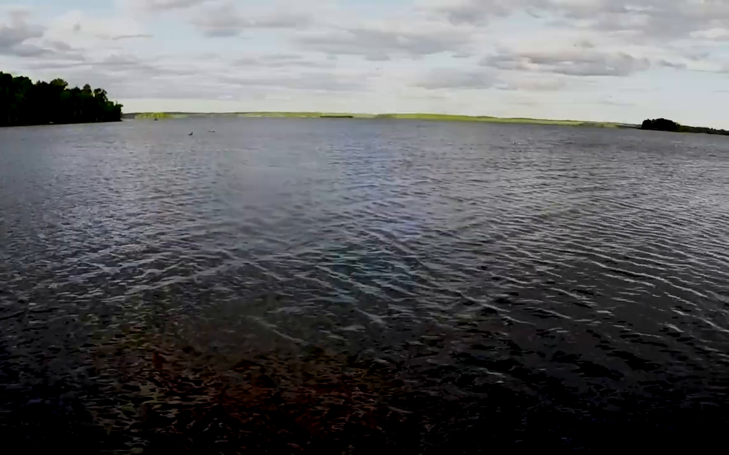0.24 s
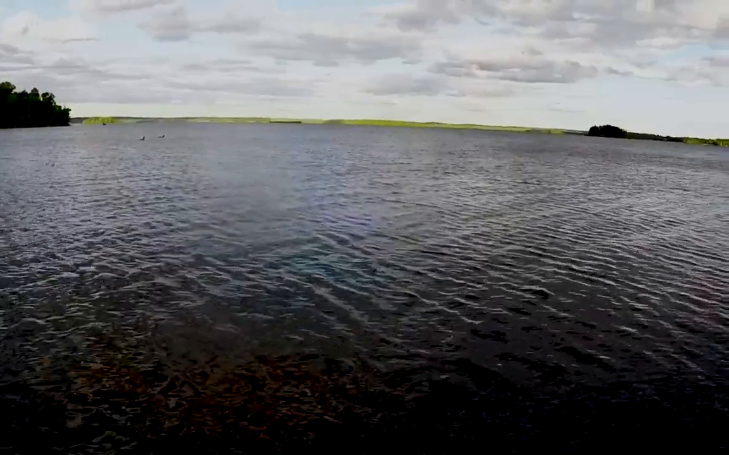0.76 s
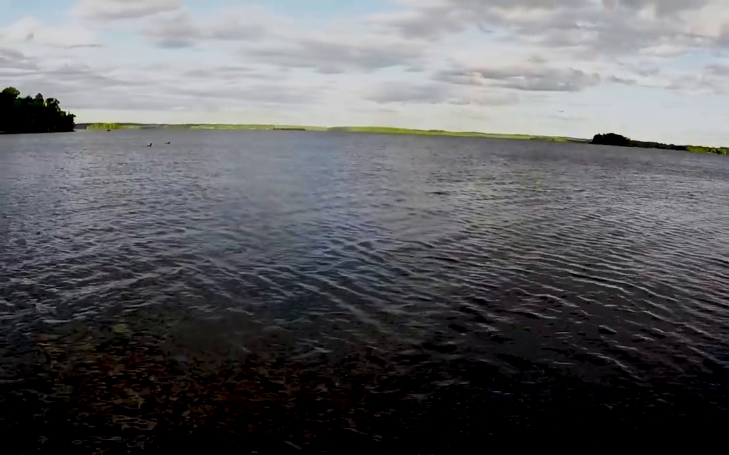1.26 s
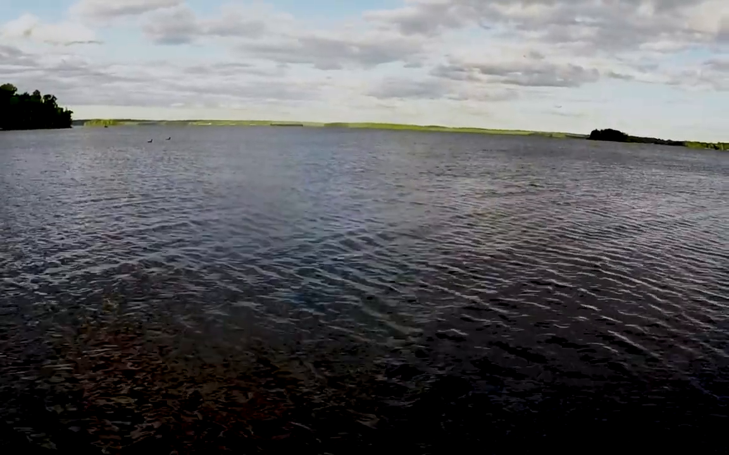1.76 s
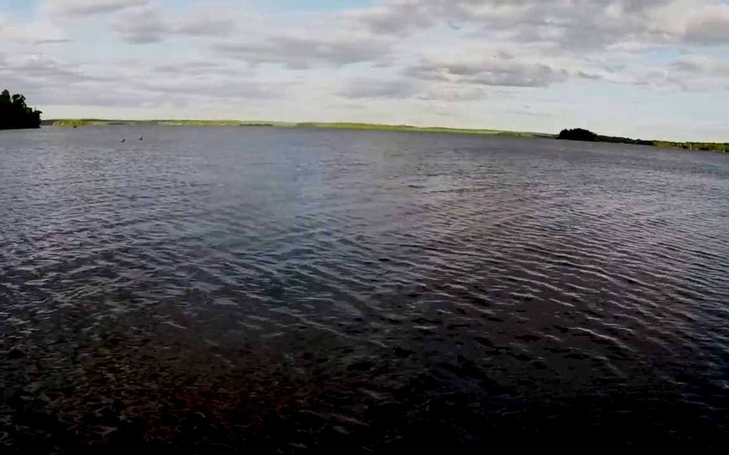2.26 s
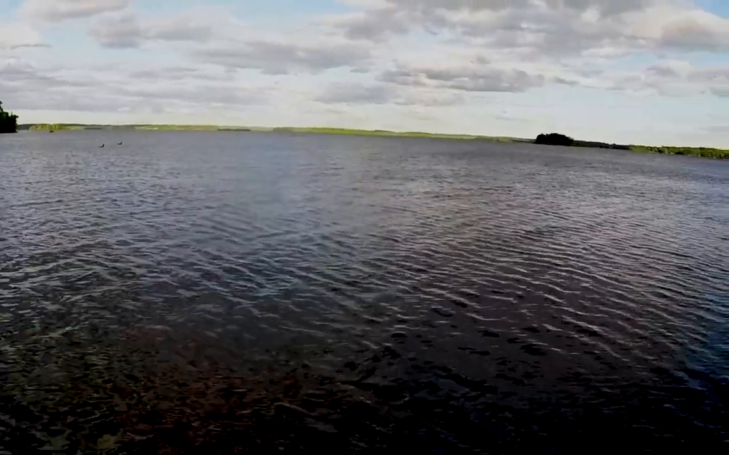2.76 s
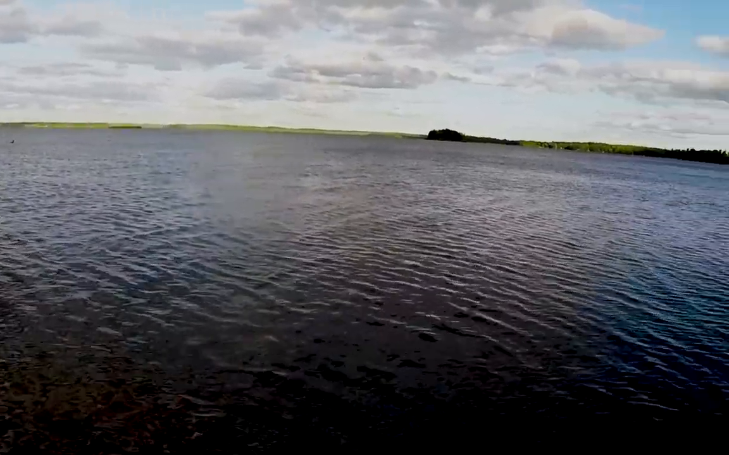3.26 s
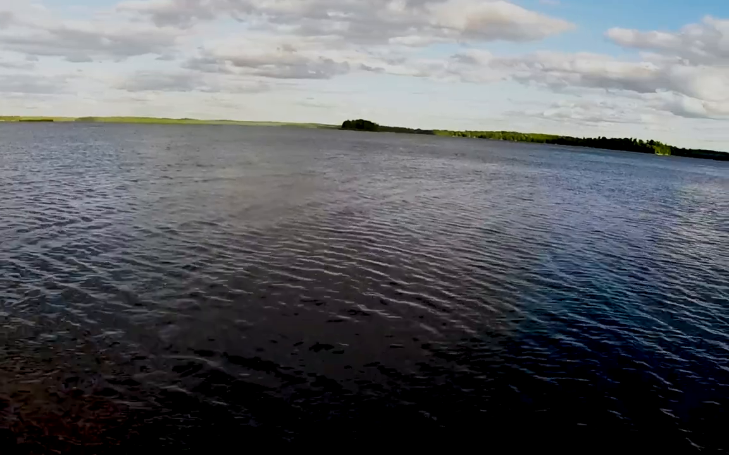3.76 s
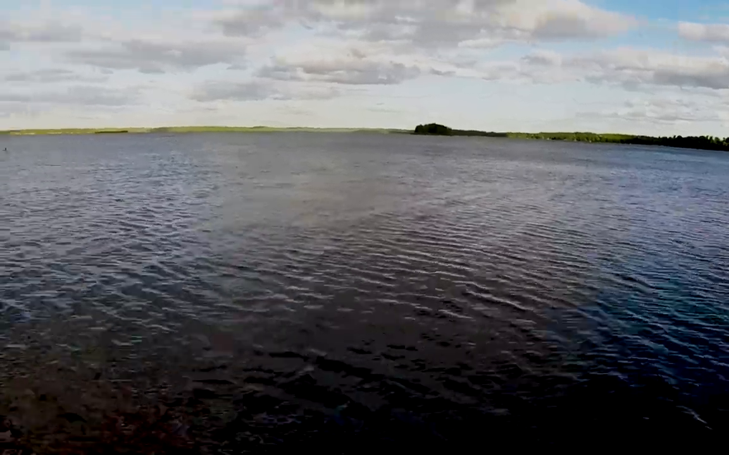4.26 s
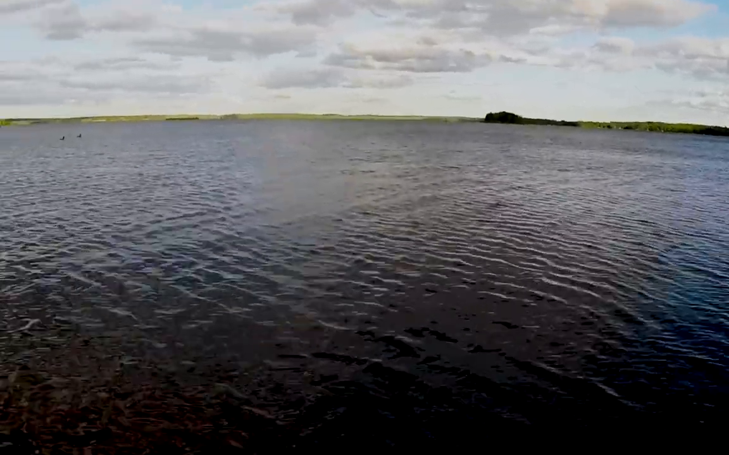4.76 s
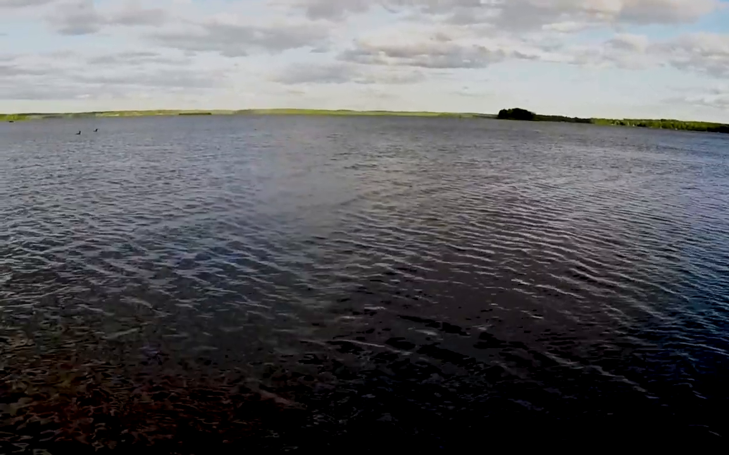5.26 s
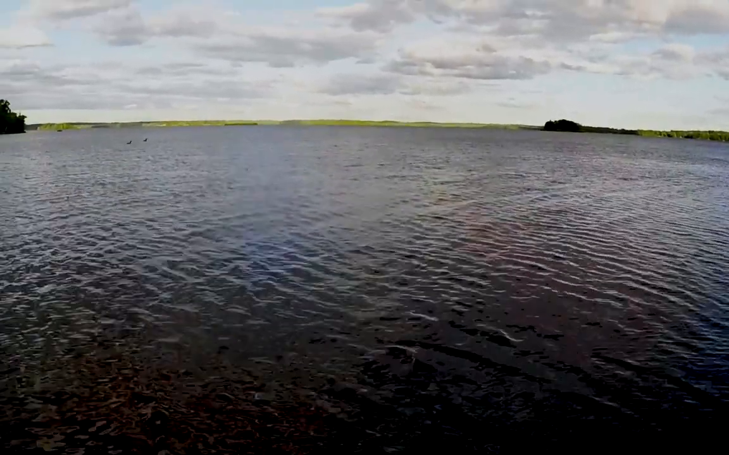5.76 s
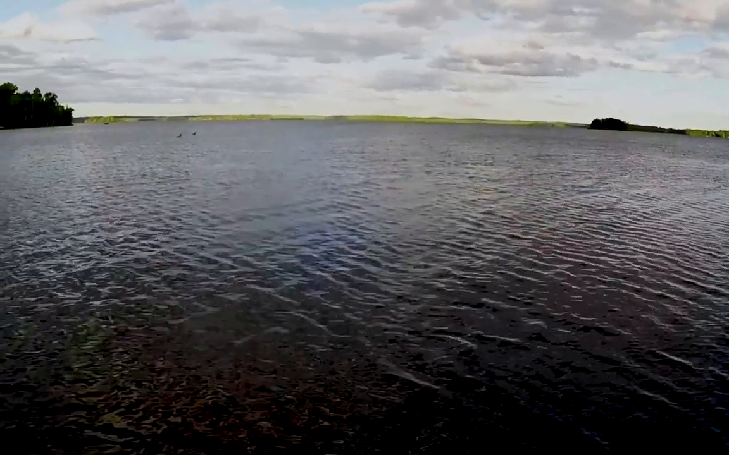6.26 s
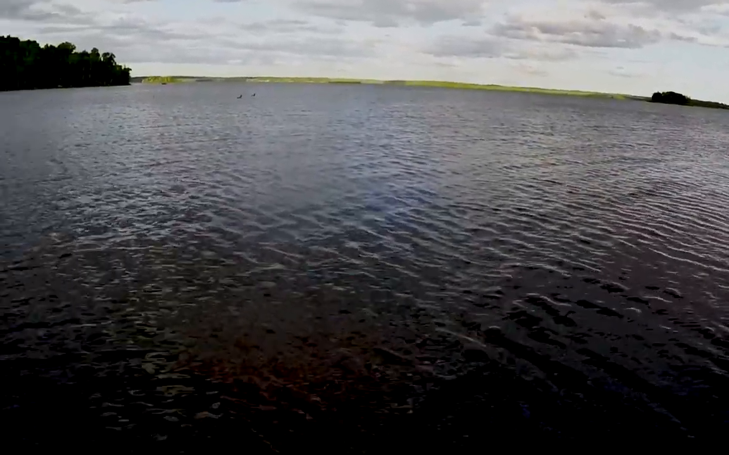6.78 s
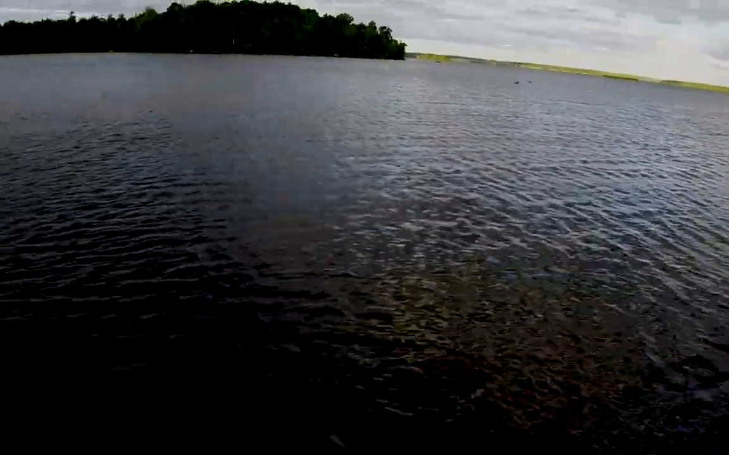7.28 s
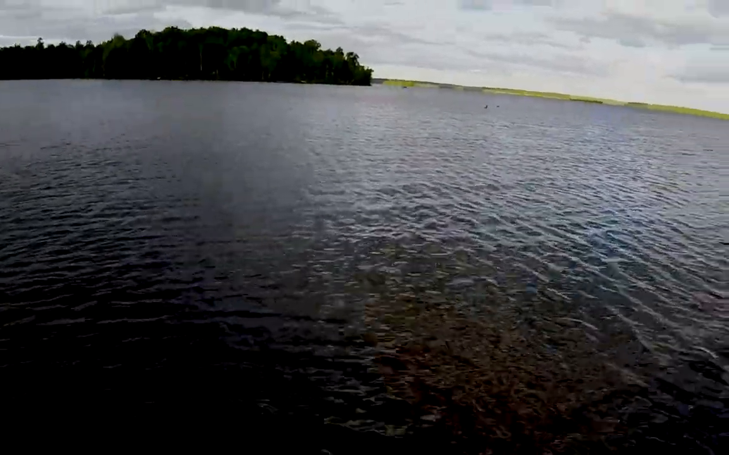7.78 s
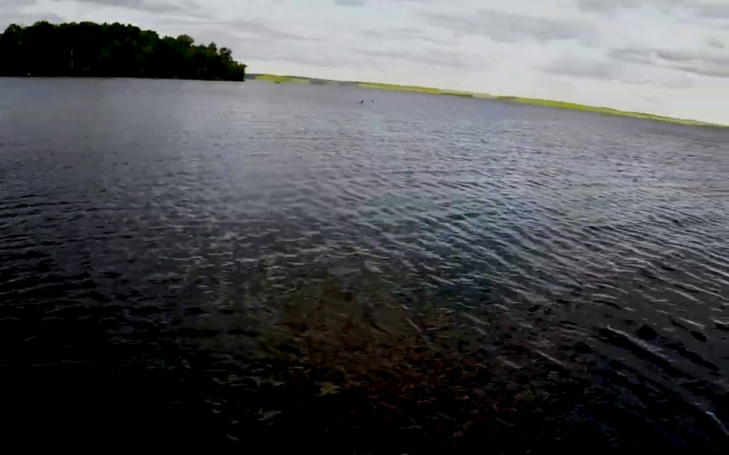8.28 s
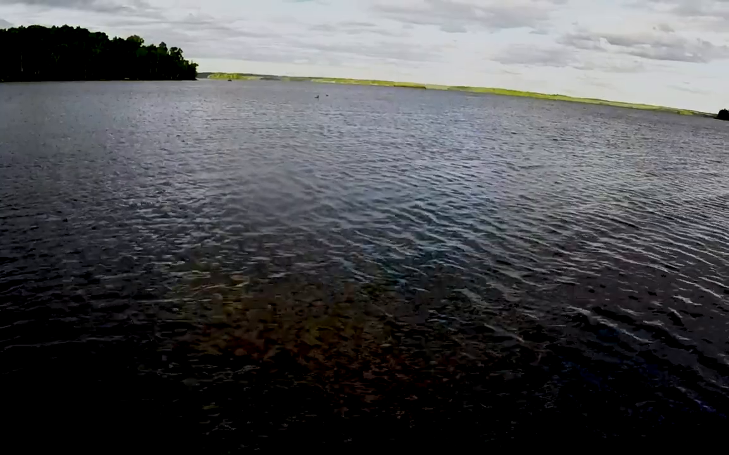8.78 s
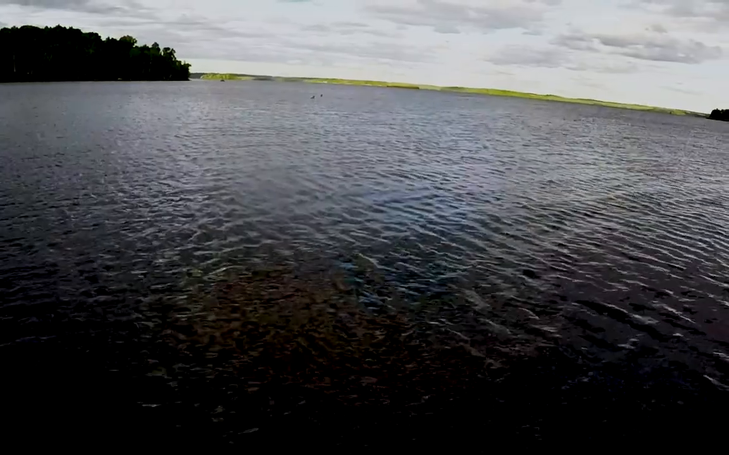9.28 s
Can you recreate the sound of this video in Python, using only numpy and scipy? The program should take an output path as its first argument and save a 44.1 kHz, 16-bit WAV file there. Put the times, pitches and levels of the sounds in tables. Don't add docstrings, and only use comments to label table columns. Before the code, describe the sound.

A loon's high, leaping yodel ends at once, then two loons exchange fast quavering laughs, the lower one nearer and steadier, the higher one answering and overlapping. Wooded shores return long soft echoes. Small waves gulp at the bank over a quiet wash and faint hiss. Late on, wind thumps and rumbles on the handheld microphone, with a few tiny handling clicks.

```python
import sys
import numpy as np
from scipy import signal
from scipy.fft import rfft, irfft, next_fast_len
from scipy.io import wavfile
from scipy.ndimage import uniform_filter1d, map_coordinates

SR = 44100
rng = np.random.default_rng(int(sys.argv[2]) if len(sys.argv) > 2 else 0)


def volts_from_db(level):
    exponent = np.asarray(level, float) / 20
    return 10 ** exponent


def unload_wav(signal):
    wavfile.write(
        sys.argv[1],
        SR,
        np.round(np.clip(np.atleast_2d(signal).T, -1, 1) * 32767).astype(np.int16),
    )


N = 420273
TIME = np.arange(N) / SR


def unit(x):
    return x / np.sqrt(np.mean(x ** 2) + 1e-20)


def along(points, hz):
    f, v = np.transpose(points)
    return np.interp(np.log(hz + 1), np.log(f + 1), v)


def wobble(rate):
    t = np.arange(0, N + 64, 64) / SR
    coarse = map_coordinates(rng.standard_normal(int(N * rate / SR) + 4), [t * rate])
    return np.interp(TIME, t, coarse)


def noise(gain):
    m = next_fast_len(N + 8192)
    spectrum = rfft(rng.standard_normal(m)) * gain(np.fft.rfftfreq(m, 1 / SR))
    return unit(irfft(spectrum, m)[:N])


def shaped_noise(points):
    return noise(lambda hz: volts_from_db(along(points, hz)))


def narrow_noise(centre_hz, width_hz):
    return noise(lambda hz: np.exp(-((hz - centre_hz) / width_hz) ** 2))


def broad_noise(centre_hz, spread):
    return noise(lambda hz: np.exp(-np.log((hz + 1) / centre_hz) ** 2 / spread))


def bursts(rows):
    return sum(volts_from_db(db) * np.exp(-((TIME - s) / half) ** 2) for s, half, db in rows)


# (frequency [Hz], gain [dB])
PIPE = [(350, -19.5), (750, -1.5), (1200, -0.5), (1600, -2), (2000, -21.5), (2400, -25.5), (3000, -31.5),
        (3600, -26.5), (4400, -35), (5200, -26.5), (6200, -44.5), (7500, -34.5), (10000, -63.5)]


def loon(phrases, facing, flare, roundness, tilt_db, waver_hz, flutter_db, breath_db, reed_db, attack, order):
    out, drift, flutter = np.zeros(N), wobble(45), wobble(60)
    turbulence = noise(lambda hz: 1 / (1 + (hz / 260) ** 2))
    k = np.arange(1, 9)[:, None]
    fading = np.array([wobble(7) for _ in k])
    when, octave_db, higher_db, top_db = np.transpose(facing)
    for rows, (end, end_hz, end_db) in phrases:
        s, hz, arch, db, swell = np.transpose([*rows, (end, end_hz, 0, end_db, 0)])
        first = max(round((s[0] - attack / 2) * SR), 0)
        at = np.arange(first, min(round((end + attack / 2) * SR), N))
        t = at / SR

        place = np.interp(t, s, np.arange(len(s)))
        row = place.astype(int)
        bow = np.abs(np.sin(np.pi * place))
        pitch = np.interp(t, s, hz) + arch[row] * bow ** roundness + waver_hz * drift[at]
        level = np.interp(t, s, db) + swell[row] * bow ** 1.47 + flutter_db * flutter[at]

        crest = np.clip(arch[row] / 190, 0, 1) * (bow - .7)
        colour = along(PIPE, k * pitch) - along(PIPE, pitch)
        colour = colour + tilt_db * np.log2(k) + np.c_[flare] * crest
        if hz.mean() > 940:
            colour += (k == 2) * np.interp(t, when, octave_db)
            colour += (k > 2) * np.interp(t, when, higher_db)
            colour += (k >= order) * np.interp(t, when, top_db)
        elif hz.mean() > 550:
            colour += (k == 2) * reed_db + (k > 2) * (6.5 - 1.6 * (k - 3))
            colour += (k > 1) * 0.86 * (level + 35)
            colour += (k == 2) * np.clip(.09 * (pitch - 860), 0, 9)
            colour += (k > 1) * np.clip(.25 * (pitch - 720), -11, 0)
        colour += (k > 1) * 2.4 * fading[:, at]

        phase = 2 * np.pi * np.cumsum(pitch) / SR
        tone = np.sum(volts_from_db(colour) * np.sin(k * phase), axis=0)
        edge = np.clip(np.minimum(t - s[0], end - t) / attack + .5, 0, 1)
        breath = 1 + volts_from_db(breath_db) * turbulence[at]
        out[at] += np.sqrt(2) * volts_from_db(level) * edge * tone * breath
    return out


def trills(throbs, breaths, entries, tails, hump_db):
    starts = [i for i, row in enumerate(throbs) if i == 0 or row[0] - throbs[i - 1][0] > .2]
    phrases = []
    for a, b, (db, fade_db), entry, tail in zip(starts, starts[1:] + [None], breaths, entries, tails):
        group = throbs[a:b]
        u = np.linspace(0, 1, len(group))
        levels = db + fade_db * u + hump_db * np.sin(np.pi * u ** .7)
        troughs = [(row[0], row[1], level) for row, level in zip(group, levels)] + tail
        rows = [entry]
        for throb, (s, hz, level), (_, next_hz, next_db) in zip(group, troughs, troughs[1:]):
            arch = throb[2] - (hz + next_hz) / 2
            swell = throb[3] - (level + next_db) / 2
            rows.append((s, hz, arch, level, swell))
        phrases.append((rows, troughs[-1]))
    return phrases


def climbs(leads, tunes, climb_db):
    shelf_hz, break_hz, flick_share = 865, 960, .2
    phrases = []
    for (start, dip, end, db), (hz, bow, dip_hz) in zip(leads, tunes):
        flick = end - flick_share * (end - dip)
        rows = [(start, hz, bow, db - .6, 0.042 * bow),
                (dip, dip_hz, 8, db, 1.8),
                (flick, shelf_hz, -6, db + climb_db, .6)]
        phrases.append((rows, (end, break_hz, db + climb_db - 7)))
    return phrases


def scoops(sweeps):
    phrases = []
    for start, end, hz, to_hz, db in sweeps:
        rise = to_hz - hz
        phrases.append(([(start, hz, 45 - .27 * rise, db, 5)], (end, to_hz, db - 2.5 + .03 * rise)))
    return phrases


def drops(falls):
    phrases = []
    for start, end, hz, db in falls:
        span = end - start
        phrases.append(([(start, hz, -4, db, 1.5)], (end, hz - 1300 * span, db - 5 - 120.5 * span)))
    return phrases


def grunts(rows):
    return [([(start, 343.5, -8, db, 1.5)], (end, 495, db + 9.5)) for start, end, db in rows]


def flips(rows):
    return [([(start, hz, 1, db, 1)], (end, hz - 25, db - 4)) for start, end, hz, db in rows]


# (time [s], pitch [Hz], arch over the line to the next row [Hz], level [dB], swell in mid-throb [dB])
YODEL = [
    [(-0.01, 1720, 18, -31, -4.5)],
    [(0.122, 1442, -59.5, -31.5, -0.5)],
    [(0.253, 1665, -16, -29, 0), (0.391, 1775, 42, -25, 2.4)],
    [(0.432, 1080, 3, -42, 3)],
]
# (time [s], pitch [Hz], level [dB])
YODEL_ENDS = [(0.12, 1607, -32.5), (0.25, 1494, -30.5), (0.43, 1680, -34.5), (0.448, 960, -46)]


def yodel():
    # (time [s], octave [dB], higher overtones [dB], topmost overtones more [dB])
    facing = [(.05, .5, 6, -1.5), (.11, -3, 1.5, -1.5), (.19, -3, -3, 1.5),
              (.27, -12, -13, 1.5), (.38, -9, -8, 1.5)]
    return loon(list(zip(YODEL, YODEL_ENDS)), facing, np.zeros(8), roundness=1.1, tilt_db=-6.0, waver_hz=3,
                flutter_db=0.0, breath_db=-35.5, reed_db=0, attack=.006, order=4)


# (trough time [s], trough pitch [Hz], crest pitch [Hz], crest level [dB])
LOW_THROBS = [(0.586, 991.0, 1220.0, -22.7), (0.683, 992.0, 1226.0, -22.4), (0.783, 981.0, 1223.0, -20.8),
              (0.89, 946.0, 1201.0, -21.9), (0.991, 980.0, 966.0, -35), (1.979, 1001.0, 1218.0, -27.3),
              (2.074, 1014.0, 1222.0, -28.7), (2.17, 1024.0, 1230.0, -28.3), (2.269, 1003.0, 1226.0, -27.2),
              (2.373, 961.0, 1196.0, -28.2), (2.473, 1007.0, 987.0, -36), (3.339, 1013.0, 1218.0, -25.3),
              (3.434, 1045.0, 1225.0, -24.2), (3.529, 1057.0, 1231.0, -24.1),
              (3.625, 1047.0, 1237.0, -23.5), (3.726, 1029.0, 1223.0, -23.4), (3.831, 1017.0, 1035.0, -30),
              (4.608, 1025.0, 1199.0, -27.3), (4.702, 1056.0, 1213.0, -27.2),
              (4.797, 1066.0, 1223.0, -28.3), (4.892, 1070.0, 1230.0, -26.8), (4.99, 1061.0, 1220.0, -26.8),
              (5.096, 1019.0, 1196.0, -26.7), (5.201, 1011.0, 994.0, -29), (5.964, 1011.0, 1206.0, -23.7),
              (6.062, 1037.0, 1219.0, -22.5), (6.158, 1049.0, 1225.0, -21.9),
              (6.256, 1042.0, 1227.0, -22.1), (6.359, 1019.0, 1209.0, -21.6), (6.463, 1022.0, 1070.0, -24),
              (7.283, 1039.0, 1221.0, -23.8), (7.38, 1081.0, 1237.0, -25.1), (7.475, 1086.0, 1237.0, -25.6),
              (7.573, 1076.0, 1230.0, -25.3), (7.677, 1031.0, 1204.0, -28.3), (7.781, 1028.0, 1009.0, -36),
              (8.565, 1009.0, 1211.0, -25.7), (8.662, 1053.0, 1224.0, -24.4),
              (8.758, 1085.0, 1231.0, -24.6), (8.855, 1087.0, 1238.0, -23.4),
              (8.956, 1076.0, 1232.0, -21.8), (9.058, 1060.0, 1148.0, -25)]
# (level in the troughs [dB], change to the end [dB])
LOW_BREATH = [(-33, 3), (-33.5, 1.5), (-30, -1), (-30, -1), (-24.5, 0), (-26.5, -4.5), (-30, 0)]
# (time [s], pitch [Hz], arch [Hz], level [dB], swell [dB])
LOW_ENTRIES = [(.535, 1330, -12, -32, 7), (1.955, 1224, 30, -31, 2.7), (3.303, 1248, -22, -30, 4),
               (4.604, 1000, 1, -33, .5), (5.943, 1160, -25, -26, 1.5), (7.232, 1240, 15, -32, 5),
               (8.537, 1165, -19, -33, 2.5)]
# (time [s], pitch [Hz], level [dB])
LOW_TAILS = [(1.03, 935, -42.5), (2.515, 960, -41), (3.932, 970, -36.5), (5.21, 990, -30),
             (6.598, 975, -32.5), (7.826, 962, -44), (9.184, 960, -37.5)]
# (start [s], end [s], level [dB])
LOW_GRUNTS = [(.325, .379, -59), (1.81, 1.84, -59.5), (3.1, 3.15, -63), (5.835, 5.865, -59),
              (7.1, 7.122, -62.5), (8.375, 8.402, -63)]
# (start [s], dip [s], break [s], level [dB])
LOW_LEADS = [(0.386, .491, .527, -36), (1.844, 1.878, 1.951, -37), (3.171, 3.242, 3.3, -37.5),
             (5.866, 5.873, 5.94, -38), (7.124, 7.196, 7.227, -34.5), (8.401, 8.475, 8.535, -35.5)]
# (start pitch [Hz], bow [Hz], dip pitch [Hz])
LOW_TUNES = [(662, 136, 710), (718, -10.5, 675), (698, 39, 720), (790, -5, 655), (721, 41.5, 723),
             (705, 32, 701)]
# (start [s], end [s], from pitch [Hz], to pitch [Hz], level [dB])
LOW_SCOOPS = [
    (4.535, 4.603, 700, 785, -39.5),
    (4.606, 4.634, 770, 880, -50),
]
# (start [s], end [s], pitch [Hz], level [dB])
LOW_DROPS = [(1.034, 1.09, 673, -39), (2.517, 2.583, 674, -39), (3.938, 3.949, 639, -48.5),
             (5.224, 5.285, 688, -41.5), (6.6, 6.624, 645, -39.5), (7.822, 7.888, 674, -39.5),
             (9.189, 9.216, 642, -44.5)]
# (start [s], end [s], pitch [Hz], level [dB])
LOW_FLIPS = [
    (.527, 0.55, 1450, -36),
    (7.225, 7.24, 1440, -41.5),
    (8.536, 8.54, 1404, -44),
]
# (time [s], octave [dB], higher overtones [dB], topmost overtones more [dB])
LOW_FACING = [(.6, 0, -4, 3), (.95, -1, 1.5, 7), (2.2, 0, -0.5, -5), (3.4, -4, -4.5, -2),
              (3.8, -3, -11.5, -2), (4.7, -1, 3, -9), (4.95, -2, 2, -9), (5.15, -1.5, -6.5, -5),
              (6.0, -0.5, -2, -9), (6.4, 1.5, -2, -12), (6.48, -5, -6, 3), (6.53, -5.5, 6, 5),
              (6.58, -6, -8, 3), (7.3, 0, -7.5, -2), (7.7, 5, -0.5, -6), (8.62, 2.5, 4, -8),
              (8.9, 3, -1, -6), (8.97, 3, -15, -3), (9.101, -1, -17, -2)]
LOW_FLARE = [.5, 4.5, 11, 16, -9, -5.5, 0, 0.5]


def low_loon():
    phrases = trills(LOW_THROBS, LOW_BREATH, LOW_ENTRIES, [[tail] for tail in LOW_TAILS], hump_db=1.1)
    phrases += grunts(LOW_GRUNTS) + climbs(LOW_LEADS, LOW_TUNES, climb_db=4.0)
    phrases += scoops(LOW_SCOOPS) + drops(LOW_DROPS) + flips(LOW_FLIPS)
    return loon(phrases, LOW_FACING, LOW_FLARE, roundness=1.25, tilt_db=-9.0, waver_hz=4, flutter_db=0.6,
                breath_db=-38.5, reed_db=.5, attack=.006, order=5)


# (trough time [s], trough pitch [Hz], crest pitch [Hz], crest level [dB])
HIGH_THROBS = [(1.806, 1000.0, 1245.0, -30.0), (1.902, 1000.0, 1240.0, -31.0),
               (1.996, 980.0, 1215.0, -32.0), (2.09, 950, 1150, -33.0), (2.19, 950),
               (3.059, 1248.0, 1440.0, -29.9), (3.145, 1208.0, 1433.0, -29.8),
               (3.239, 1190.0, 1424.0, -32.3), (3.335, 1190, 1350, -35), (3.436, 1136),
               (4.156, 1231.0, 1412.0, -27.8), (4.241, 1226.0, 1422.0, -27.7),
               (4.33, 1219.0, 1421.0, -27.1), (4.421, 1206.0, 1403.0, -29.6),
               (4.522, 1156.0, 1350.0, -32.8), (4.62, 1141), (5.275, 1240.0, 1406.0, -27.1),
               (5.362, 1246.0, 1417.0, -25.8), (5.451, 1225.0, 1414.0, -25.9),
               (5.544, 1213.0, 1398.0, -26.2), (5.646, 1161.0, 1340.0, -29.6), (5.753, 1150.0),
               (6.5, 1252.0, 1417.0, -29.6), (6.588, 1239.0, 1424.0, -27.8), (6.68, 1235.0, 1425.0, -25.7),
               (6.779, 1192.0, 1386.0, -27.4), (6.884, 1158.0), (9.33, 1252.0, 1477.0, -26.6),
               (9.425, 1216.0, 1443.0, -28.8), (9.529, 1214.0)]
# (level in the troughs [dB], change to the end [dB])
HIGH_BREATH = [(-38, -4), (-39, -3), (-40, -2.5), (-41, -2), (-40, -1), (-39.5, -1)]
# (time [s], pitch [Hz], arch [Hz], level [dB], swell [dB])
HIGH_ENTRIES = [(1.757, 1255, 18.5, -30, 2.5), (3.025, 1400, -31.5, -32, 1), (4.13, 1365, -11.5, -36, 1.5),
                (5.237, 1406, 2.5, -30, 2), (6.46, 1376, 19, -38, 2), (9.268, 1490, 76.5, -26.5, 4)]
# (start [s], dip [s], break [s], level [dB])
HIGH_LEADS = [(1.666, 1.726, 1.755, -39), (4.018, 4.072, 4.09, -38), (6.37, 6.417, 6.44, -35.5),
              (9.047, 9.058, 9.108, -41)]
# (start pitch [Hz], bow [Hz], dip pitch [Hz])
HIGH_TUNES = [(786, 54, 737), (758, 16.5, 742), (746, -11, 727), (700, 3, 715)]
# (start [s], end [s], from pitch [Hz], to pitch [Hz], level [dB])
HIGH_SCOOPS = [
    (2.219, 2.25, 660, 900, -49),
    (2.876, 2.922, 660, 910, -43.5),
    (5.138, 5.19, 742, 766, -38),
]
# (start [s], end [s], pitch [Hz], level [dB])
HIGH_DROPS = [(3.449, 3.466, 640, -47.5), (4.635, 4.65, 665, -45.5), (5.765, 5.793, 693, -43),
              (6.901, 6.965, 690, -42)]
# (time [s], pitch [Hz], arch [Hz], level [dB], swell [dB])
STEPS = [
    [(2.925, 1226, -13, -28.5, 3), (2.972, 984, 33.5, -35.5, 5.5)],
    [(4.095, 1181, 43, -32, 2.5)],
    [(5.195, 963, 9.2, -30, .4)],
    [(6.445, 1170, 30.3, -23.5, 3.5)],
    [(9.11, 1270, -19.5, -36, 5), (9.15, 1076, 220, -35.5, 10), (9.236, 1039, -32, -35, 0)],
]
# (time [s], pitch [Hz], level [dB])
STEP_ENDS = [(3.022, 1280, -27.5), (4.135, 1137, -36), (5.235, 1246, -28.5), (6.475, 1092, -33),
             (9.265, 1290, -29)]
# (time [s], octave [dB], higher overtones [dB], topmost overtones more [dB])
HIGH_FACING = [(1.78, -3, -3, 6), (1.9, 3, -2, 8), (2.14, 5, -8, 3), (2.98, -1.5, -9, -2),
               (3.1, -11.5, -12, -2), (3.38, -3.5, -9, 13), (4.2, 0, -2, 0), (4.42, 0, -3, 5),
               (4.58, -9.5, -8, 19), (5.21, -1.5, -8, -9), (5.33, 1, -2, 1.5), (5.56, -2.5, -2, 7),
               (5.72, -11, -10, 14), (6.55, 0, 2, -9), (6.7, -7, -10, -5), (6.85, -9, -12.5, -5),
               (9.2, 6.5, -14, -3), (9.35, -9, -1.5, 1.5)]
HIGH_FLARE = [1.5, 13.5, 16, -27, 7, -3, 2, 1]


def high_loon():
    phrases = trills(HIGH_THROBS, HIGH_BREATH, HIGH_ENTRIES, [[] for _ in HIGH_ENTRIES], hump_db=.8)
    phrases += climbs(HIGH_LEADS, HIGH_TUNES, climb_db=1.0)
    phrases += scoops(HIGH_SCOOPS) + drops(HIGH_DROPS) + list(zip(STEPS, STEP_ENDS))
    return loon(phrases, HIGH_FACING, HIGH_FLARE, roundness=1.3, tilt_db=-7.0, waver_hz=4.3, flutter_db=.9,
                breath_db=-36.5, reed_db=-2.5, attack=.007, order=4)


def echo(x, decay, size, delay):
    hz, t, z = signal.stft(rng.standard_normal(size), SR, nperseg=256)
    build = 1 - np.exp(-(t / delay) ** 2)
    fall = volts_from_db(-60 * t / along(decay, hz)[:, None])
    tail = signal.istft(z * build * fall, SR, nperseg=256)[1]
    return signal.oaconvolve(x, tail / np.linalg.norm(tail))[:N]


def ripples(cries):
    return volts_from_db(-20) * echo(cries, [(1000, 0.13)], size=6000, delay=0.0013)


# (frequency [Hz], time to fall 60 dB [s])
SHORE = [(600, 3.6), (1200, 3.24), (1800, 5.7), (4000, 1.49)]


def shores(cries):
    return volts_from_db(-33.0) * echo(cries, SHORE, size=130000, delay=0.14)


def earlier_echo():
    bands = [(1725, 92, -53.0), (1170, 110, -64.5)]  # (frequency [Hz], width [Hz], level [dB])
    return sum(volts_from_db(db - 60 * TIME / 4.5) * narrow_noise(hz, width) for hz, width, db in bands)


# (time [s], level [dB])
WIND = [(0.0, -66), (0.62, -57), (5.1, -58), (5.3, -47), (5.6, -47), (6.0, -45), (6.45, -37), (6.66, -28),
        (6.9, -24.5), (7.1, -26), (7.22, -30), (7.55, -36), (7.9, -44), (8.2, -46), (8.5, -40), (8.9, -40),
        (9.15, -44), (9.3, -55)]
# (time [s], half length [s], level [dB])
GUSTS = [(5.22, .04, -45), (5.46, .04, -44), (5.74, .035, -28), (5.9, .035, -32), (6.14, .03, -39),
         (6.27, .05, -33), (6.46, .03, -35), (6.69, .05, -30), (7.02, .03, -26), (7.1, .03, -26),
         (7.3, .04, -32), (7.63, .05, -31), (7.74, .04, -38), (7.94, .03, -38), (8.03, .05, -33),
         (8.33, .04, -42), (8.62, .04, -31), (8.7, .03, -31), (8.82, .03, -38), (9.01, .07, -26)]


def wind_force():
    return volts_from_db(np.interp(TIME, *np.transpose(WIND))) + bursts(GUSTS)


# (frequency [Hz], density [dB per Hz])
BUFFET = [(12, -28), (20, 2), (43, 0.5), (81, -5.5), (340, -39), (403, -43), (600, -43), (780, -67.5),
          (1320, -120)]


def microphone_wind(force):
    lumps = volts_from_db(1.2 * wobble(6) + 2.6 * wobble(17))
    buffet = force * unit(lumps * shaped_noise(BUFFET))
    tearing_db = -49.0 + 1.4 * (20 * np.log10(force) + 27.5) + 2.6 * wobble(21)
    tearing = lumps ** 1.2 * volts_from_db(tearing_db) * broad_noise(130, 0.38)
    return buffet + tearing


# (time [s], half length [s], level [dB])
LEAVES = [(3.823, 0.069, -68.5), (5.822, 0.089, -64.5), (6.197, 0.084, -70.5), (6.705, .05, -64.5),
          (6.828, .09, -67.5), (7.463, 0.035, -59.5), (7.66, 0.033, -65.5), (7.945, .035, -69.5),
          (9.522, 0.028, -68)]
# (frequency [Hz], density [dB per Hz])
RUSTLE = [(1200, -18), (3000, -2.5), (5500, -2), (8000, -10), (14000, -25)]


def leaves(force):
    puffs = volts_from_db(-73.5 + 0.78 * (20 * np.log10(force) + 27.0)) + bursts(LEAVES)
    return puffs * volts_from_db(2.4 * wobble(25)) * shaped_noise(RUSTLE)


# (time [s], peak level [dB], frequency [Hz], time to fall 60 dB [s])
GULPS = [(0.197, -49, 146.6, 0.19), (0.636, -45.5, 319, 0.2), (0.764, -35, 361, 0.15),
         (1.612, -47, 180, 0.27), (2.249, -38, 290, 0.12), (2.605, -31.5, 129, 0.12),
         (2.669, -41, 127, 0.33), (2.82, -37.5, 219, 0.22), (3.176, -37.5, 208, 0.17),
         (4.115, -41, 192, 0.22), (4.222, -40, 264, 0.17), (4.585, -42, 213, 0.22), (4.719, -45, 202, 0.18),
         (5.406, -36, 310, 0.15), (5.687, -43.5, 218, 0.2), (8.369, -41.5, 200, 0.26),
         (8.83, -43, 158, 0.21), (9.207, -37.5, 138, 0.18), (9.36, -44.5, 330, 0.16)]


def wavelets():
    out, t = np.zeros(N + SR), np.arange(SR // 3) / SR
    slosh = broad_noise(280, 0.37)
    for s, db, hz, t60 in GULPS:
        i, life = round(s * SR), np.clip(t60, .04, .3)
        tone = np.sin(2 * np.pi * hz * (t + .12 * t * t / life))
        wet = np.resize(slosh[i:], len(t))
        envelope = volts_from_db(db - 60 * t / life) * (1 - np.exp(-t / 0.004))
        out[i:][:len(t)] += envelope * (tone + 0.52 * wet)
    return out[:N]


# (start [s], end [s], from pitch [Hz], to pitch [Hz], level [dB])
CHIRPS = [
    (1.41, 1.492, 3300, 3050, -62),
    (1.557, 1.619, 2600, 3660, -61),
    (3.96, 4.002, 3100, 2740, -59),
    (4.65, 4.8, 3300, 2800, -63.5),
]


def songbird():
    out = np.zeros(N)
    for start, end, from_hz, to_hz, db in CHIRPS:
        pitch = np.linspace(from_hz, to_hz, round((end - start) * SR))
        whistle = np.sin(2 * np.pi * np.cumsum(pitch) / SR)
        out[round(start * SR):][:len(pitch)] += volts_from_db(db) * np.hanning(len(pitch)) * whistle
    return out


# (time [s], peak level [dB], frequency [Hz])
TICKS = [
    (5.5183, -54, 2500),
    (6.8347, -45.5, 2700),
    (9.093, -39, 2280),
    (9.4591, -43, 3270),
    (9.5, -49, 2730),
]


def ticks():
    out, t = np.zeros(N + SR), np.arange(600) / SR
    for s, db, hz in TICKS:
        rasp = uniform_filter1d(rng.standard_normal(len(t)), size=3)
        click = .42 * rasp + 0.77 * np.sin(2 * np.pi * hz * t)
        out[round(s * SR):][:len(t)] += volts_from_db(db - 60 * t / 0.014) * click
    return out[:N]


# (frequency [Hz], width [Hz], level [dB])
MOTOR = [
    (91, 7, -60.5),
    (181, 8, -63.5),
    (206.5, 21, -64),
]


def motor():
    return sum(volts_from_db(db) * narrow_noise(hz, width) for hz, width, db in MOTOR)


# (frequency [Hz], density [dB per Hz])
AIR = [(12, -40), (20, -6.5), (80, -6.5), (129, -1), (180, -3.5), (237, -5.5), (370, -6.5), (925, -11),
       (1190, -2.5), (1440, -22), (1700, -16.5), (4260, -28), (15300, -33.5)]


def air():
    return volts_from_db(-52 + 0.25 * wobble(1.8)) * shaped_noise(AIR)


def scene():
    high = high_loon()
    cries = volts_from_db(0.9) * (low_loon() + high + yodel())
    echoes = ripples(cries) + shores(cries + 0.89 * high) + earlier_echo()
    force = wind_force()
    weather = microphone_wind(force) + leaves(force)
    return (cries + echoes + weather + wavelets() + songbird() + ticks() + motor() + air())[None]


def low_pass(x):
    return signal.sosfilt(signal.butter(12, 15620, fs=SR, output="sos"), x)


def record(dry):
    return low_pass(dry)


dry = scene()
out = record(dry)
unload_wav(out)
```